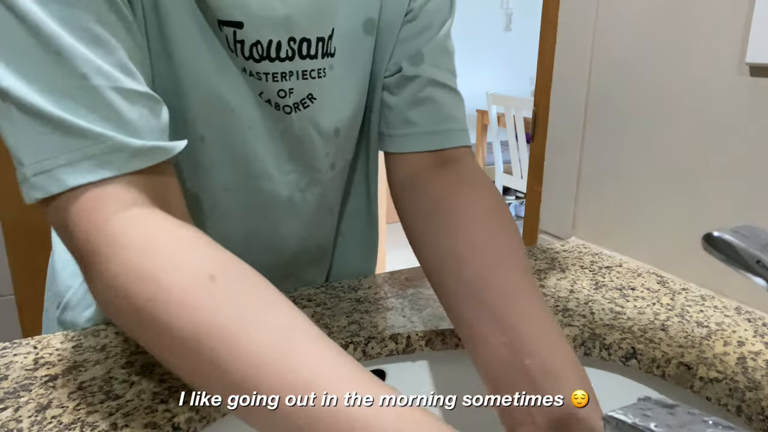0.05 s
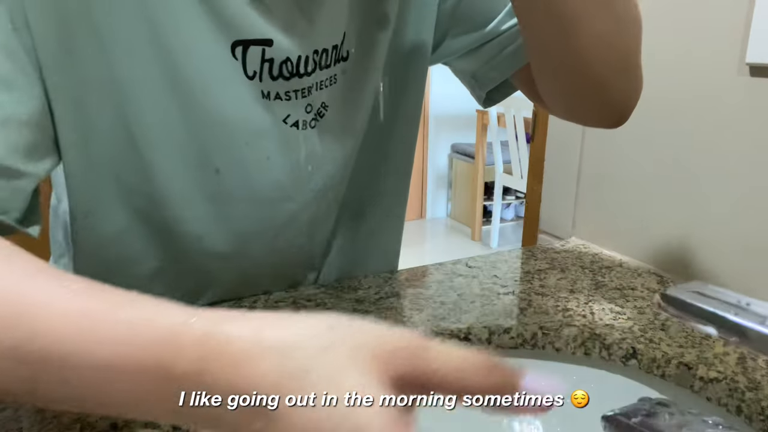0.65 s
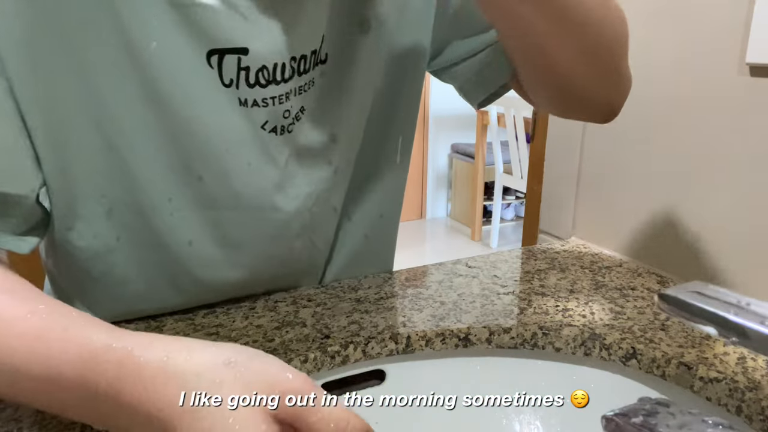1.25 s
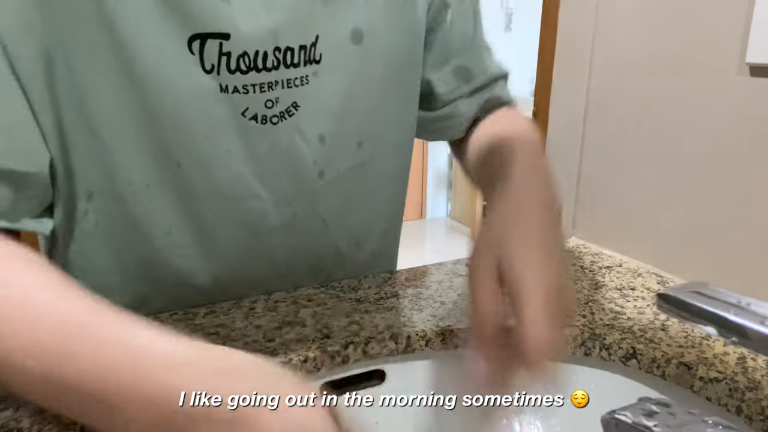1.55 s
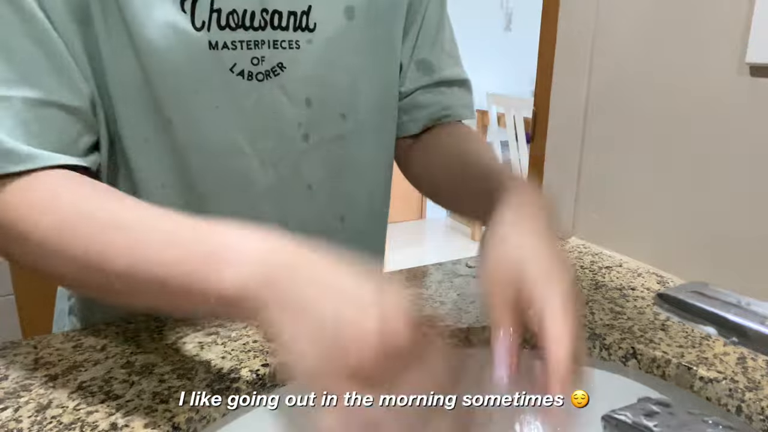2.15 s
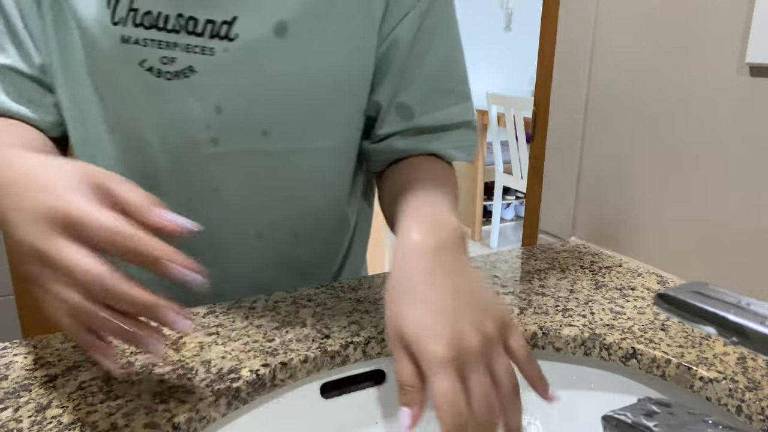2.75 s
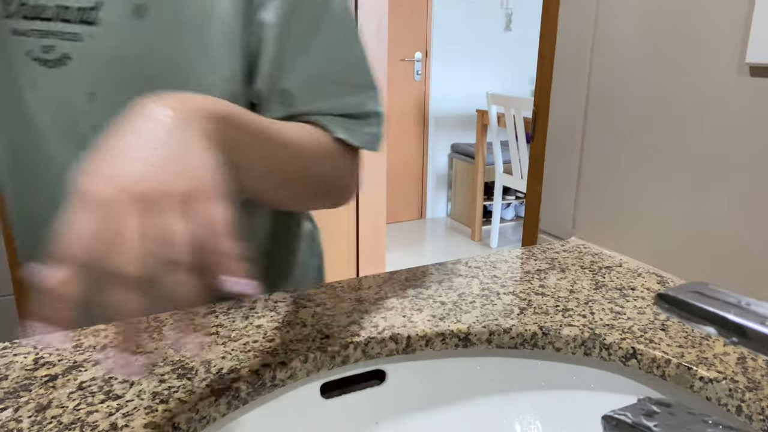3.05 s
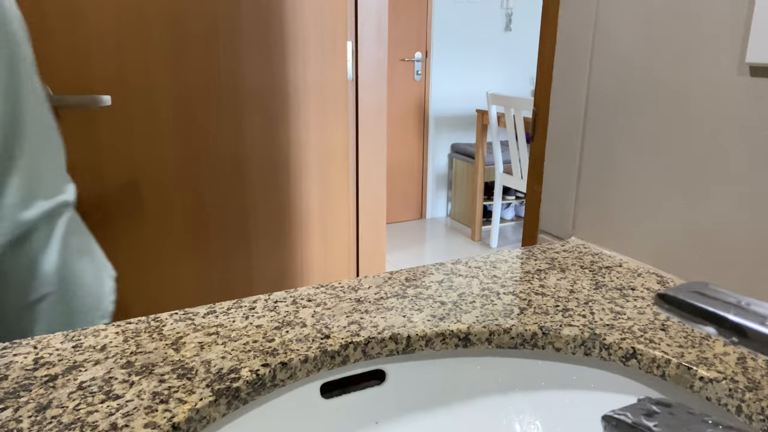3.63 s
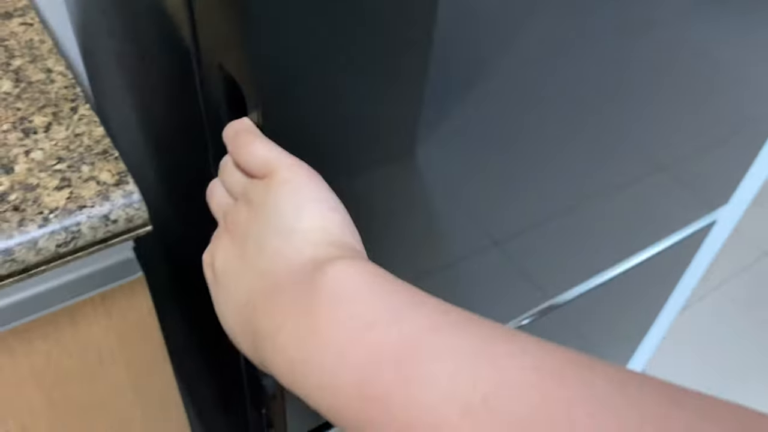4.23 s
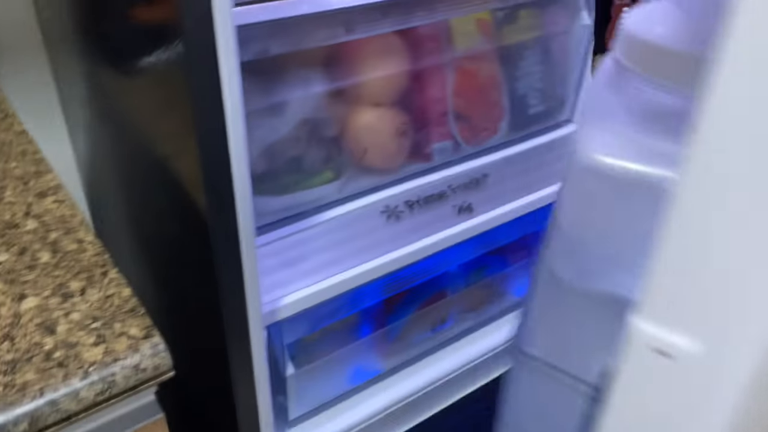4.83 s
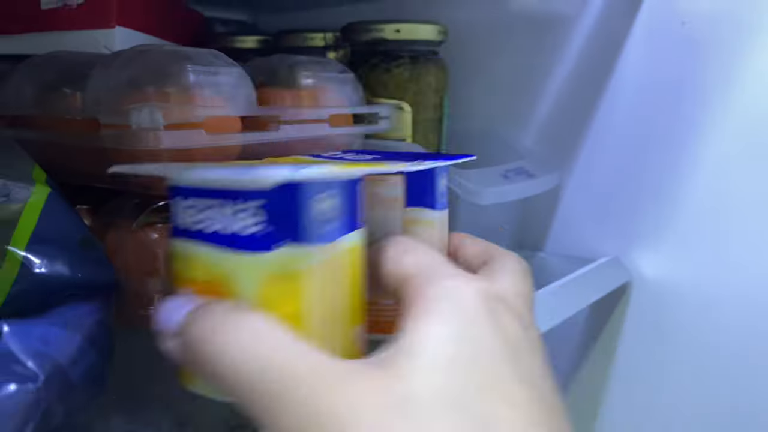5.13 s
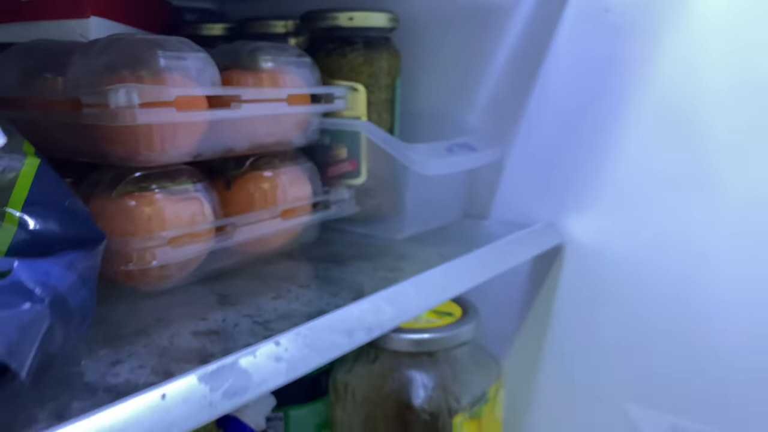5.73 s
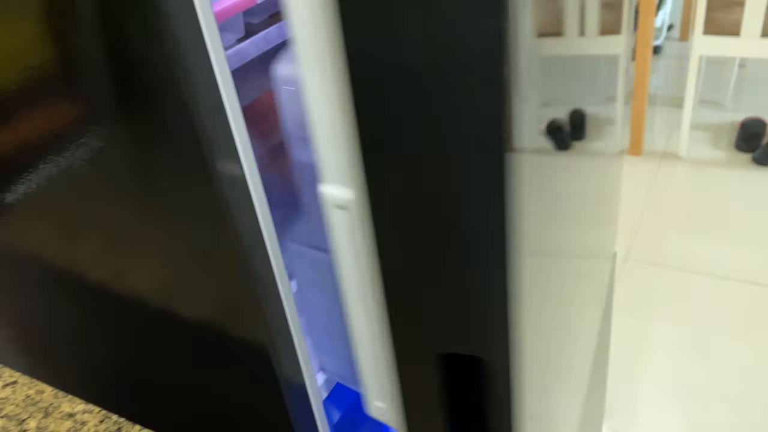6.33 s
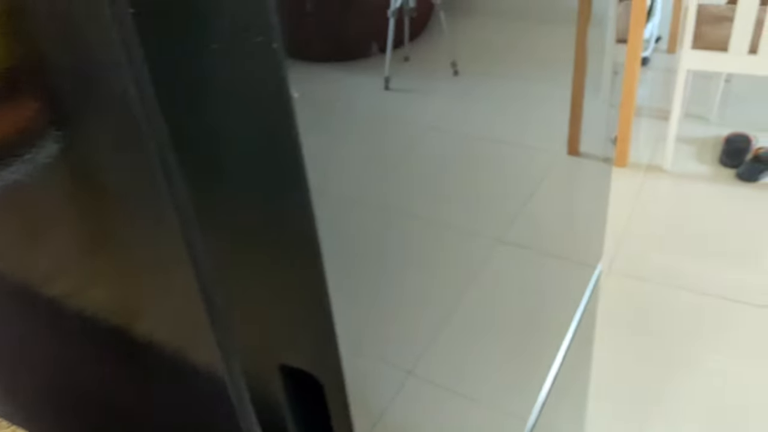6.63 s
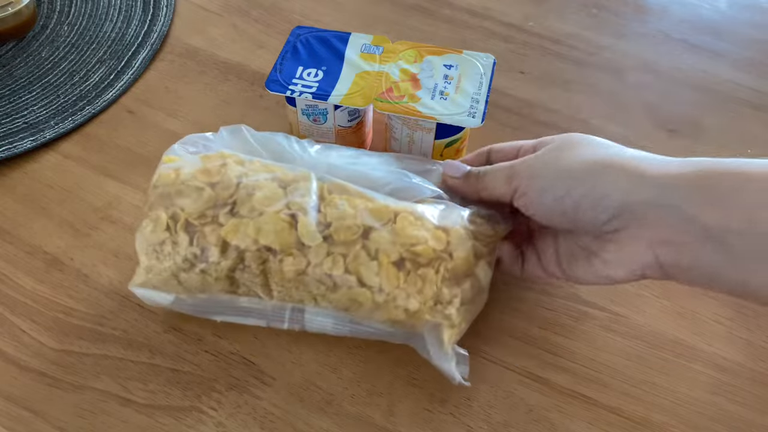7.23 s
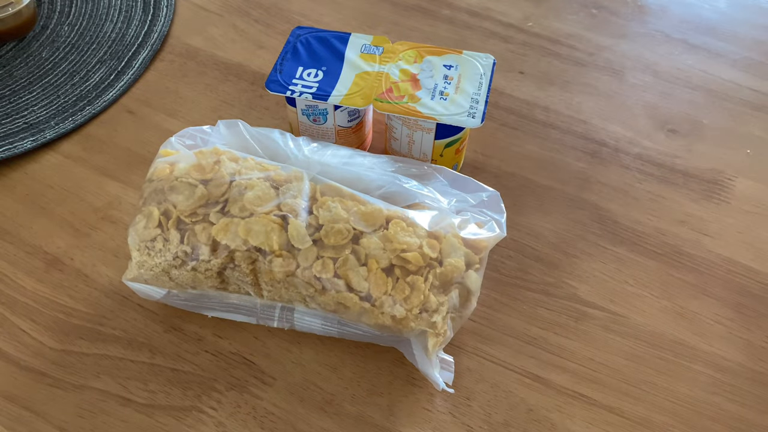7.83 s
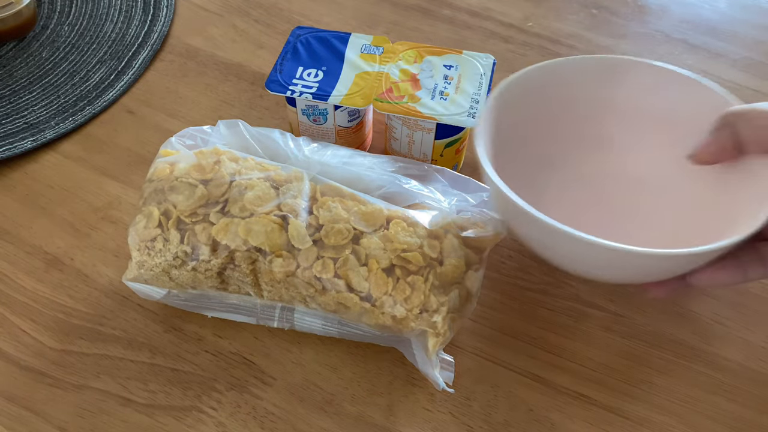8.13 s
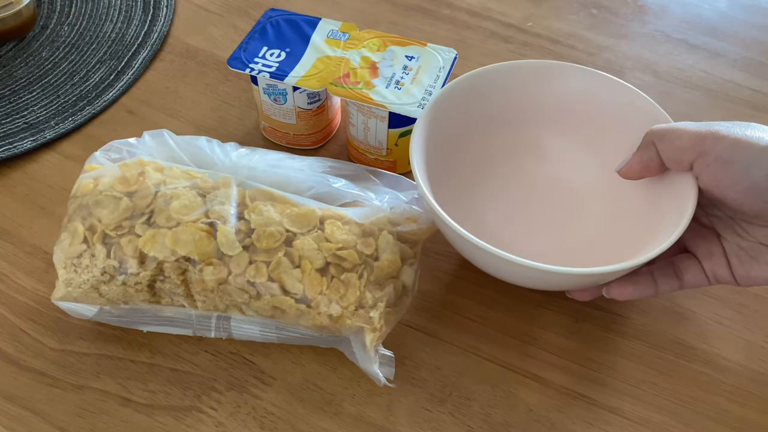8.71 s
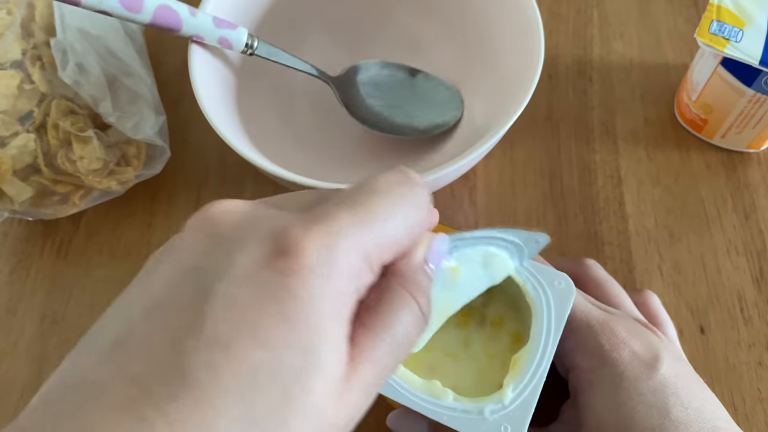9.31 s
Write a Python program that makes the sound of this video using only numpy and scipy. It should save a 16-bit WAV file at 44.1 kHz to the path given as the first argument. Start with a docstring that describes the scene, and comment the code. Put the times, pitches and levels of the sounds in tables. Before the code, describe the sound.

Running water and drips under a fan hum, then a slammed fridge door, a crackling cereal bag and a tearing foil lid.

```python
"""Water hisses from a tap and is shut off; hands drip while an extractor fan drones in its duct.
Three more scenes of a morning at home follow. A fridge gasket peels open, jars knock, and the slammed
door sets the cabinet booming. A cereal bag crackles and lands on a table with a bowl, while two heavy
thuds ring a wooden panel in another room. Last, a foil lid rips off a yoghurt cup by stick-slip of its
glue. Each impact is a brief force that excites resonances, followed by the echo of hard walls."""
import sys
import numpy as np
from scipy import signal
from scipy.fft import rfft, irfft, next_fast_len
from scipy.io import wavfile

SR = 44100
rng = np.random.default_rng(int(sys.argv[2]) if len(sys.argv) > 2 else 0)


def master_out(mix):
    """Clip the mix to full scale and print it as 16-bit PCM to the path in sys.argv[1]."""
    frames = np.transpose(np.atleast_2d(mix))
    ceiling = np.clip(frames, -1, 1)
    pcm = np.round(ceiling * 32767).astype(np.int16)
    wavfile.write(sys.argv[1], SR, pcm)


N = 422037
TIME = np.arange(N) / SR
BATHROOM_END_S, FRIDGE_END_S, TABLE_END_S = 4.22, 6.82, 8.955


def water_jet(shut_s=0.35, shut_db_per_s=88):
    """Bubble resonance: air carried in the jet fizzes and rings, fading as the tap is shut."""
    # spectrum of the fizz: frequency_hz, density_db
    spectrum = [(200, -21), (500, -2.5), (900, 4.5), (1500, 1.5), (3000, -0.5), (8000, -0.5), (13000, -2.5),
                (16000, -11.5)]
    # last water running off the hands: peak_s, level_db, rise_s, release_s
    run_off = [(.94, -61, 2.4, .7)]
    valve = from_db(-shut_db_per_s * np.maximum(TIME - shut_s, 0))
    flow = dying(0, db=-39.5, db_per_s=8.5) * valve + swells(run_off)
    fizz = colour(diffuse() + from_db(-2.5) * near(grains(2500, 5.7), 0.14, scatter_db=1), spectrum)
    bubbles = sum(resonate(grains(25, 3.0), hz, hz / 14) for hz in np.geomspace(550, 3200, num=7))
    return flow * (fizz + from_db(-17.5) * bubbles)


def splashes():
    """Damped resonance: air pockets gulp, the larger ones for longer, and drops tick on the basin."""
    # air pockets in the water and the closing spout: start_s, level_db, pitch_hz
    pockets = [(.075, -35, 1970), (.11, -31.5, 850), (.15, -30, 580), (.395, -31, 533), (.413, -30, 3200),
               (.428, -29.5, 670), (.446, -21, 470), (.452, -35.5, 1400), (.491, -31.5, 5300),
               (.54, -32.5, 510)]
    # drops hitting the basin: start_s, level_db, pitch_hz
    drop_hits = [(0.056, -22.5, 12400), (0.158, -28, 11500), (0.309, -20, 6600), (0.5343, -29, 9200),
                 (.626, -44, 7600), (.7997, -41, 7750), (.9712, -40, 5140), (1.305, -45, 13300),
                 (1.3875, -46, 5300), (1.5963, -42.5, 7500), (2.201, -45, 5110)]
    # wet hands rubbing and flicking water: start_s, level_db, pitch_hz, t60_s
    flicks = [(.79, -53, 6000, .2), (.95, -57, 7000, 0.29), (1.02, -64, 4950, .1), (2.17, -61.5, 9000, 0.3),
              (2.68, -54, 4960, 0.28)]
    glugs = knocks(sized(pockets, t60_at_1khz=.09, exponent=.45), damping=0.32)
    drops = knocks([(s, db, hz, 0.02) for s, db, hz in drop_hits], damping=1.5)
    water = glugs + from_db(-1.5) * drops + knocks(flicks, damping=1.8)
    return near(water, 0.17, scatter_db=-1.5) + from_db(-3) * room(water)


def door_slam():
    """Impact excitation: the fridge door clacks, rings the cabinet's modes and fills the room."""
    # door meeting the cabinet: start_s, thump_db, clack_db
    slams = [(6.52, -9, -10)]
    # modes of the panels and the long boom of the kitchen: pitch_hz, level_db, t60_s
    cabinet_modes = [(63, -1.5, 0.29), (64.8, -18.5, 6.2), (154.7, -16, 0.27), (251.6, -21, 0.29),
                     (304.6, -13, 0.27), (341, -26, 0.67), (538, -40, 0.2), (690, -23, 0.38)]
    # spectrum of the clack: frequency_hz, density_db
    spectrum = [(60, 6.5), (110, 4), (350, 0), (500, -4.5), (1000, -7.5), (1800, -14.5), (3000, -16),
                (7000, -23.5), (11000, -26.5), (13600, -23), (16000, -51)]
    clack = colour(bursts([(s, db, .06) for s, _, db in slams]), spectrum)[0]
    thump = struck([(s, db) for s, db, _ in slams], cabinet_modes)
    echo = room(colour(impulses([(s, db) for s, _, db in slams]), spectrum))
    crash = from_db(3) * near(clack, -0.19, scatter_db=-7) + from_db(22) * echo
    return thump + crash * from_db([[1], [-1]])


def fridge_handling():
    """Friction and impact: the gasket peels and pops, cups scrape, bottles knock, the latch clicks."""
    # gasket peeling off, then brushing and squeezing shut: peak_s, level_db, rise_s, release_s
    gasket_moves = [(4.305, -26.5, .22, 0.12), (4.41, -41.5, 0.46, 0.47), (6.48, -47.5, 0.9, 0.14),
                    (6.526, -17, 0.06, 0.036)]
    # spectrum of the gasket: frequency_hz, density_db
    gasket_spectrum = [(29, -28), (50, -0.5), (118, -15), (165, -3), (230, -12), (449, -8.5), (494, -18.5),
                       (836, -18), (1630, -26), (2070, -28), (15000, -57.5)]
    # cups dragged along the shelf: peak_s, level_db, rise_s, release_s
    shelf_drags = [(5.1, -70.5, 0.44, .12), (5.17, -63, .04, 0.42), (5.27, -67.5, 0.28, 0.14),
                   (5.434, -65.5, 0.057, 0.16), (5.9, -66.5, 0.92, 0.49)]
    # gasket popping open, bottles and racks knocking, door latch clicking:
    # start_s, level_db, pitch_hz, tick_db
    impacts = [(4.302, -30.5, 740, -53), (4.402, -40.5, 850, -64), (4.643, -48.5, 250, -82),
               (4.777, -59.5, 1810, -68), (4.82, -62.5, 710, -65), (5.078, -50.5, 202, -72),
               (5.154, -52, 244, -45), (5.163, -46.5, 1130, -53), (5.93, -47, 224, -54),
               (6.164, -52, 1580, -66), (6.271, -52, 706, -78), (6.308, -44.5, 1000, -62),
               (6.423, -34, 396, -83), (6.608, -29.5, 704, -24)]
    gasket = swells(gasket_moves) * colour(grains(1500, 3.5), gasket_spectrum)[0]
    drag = swells(shelf_drags) * resonate(diffuse(), 2500, width_hz=4200)
    ticks = bursts([(s, tick_db, .04) for s, _, _, tick_db in impacts])
    rings = knocks(sized(impacts, t60_at_1khz=0.096, exponent=0.71), damping=1.0)
    contacts = gasket + ticks + rings
    return near(contacts, 0.12, scatter_db=4.5) + from_db(-9) * room(contacts) + drag


def bag_creases():
    """Buckling: each crease of the plastic bag snaps through with a tick and a short ring."""
    # creases snapping: start_s, level_db, pitch_hz, tick_db
    snaps = [(6.854, -30, 1280, -29.5), (6.934, -30.5, 1700, -46), (6.997, -28.5, 630, -26.5),
             (7.012, -22.5, 1890, -36), (7.05, -24.5, 630, -22.5), (7.095, -34, 1820, -21.5),
             (7.215, -37, 1130, -39), (7.309, -42, 1040, -17.5), (7.343, -38, 600, -32),
             (7.396, -31, 2400, -32), (7.441, -34, 560, -44), (7.533, -36.5, 820, -36.5),
             (7.586, -39, 2850, -45), (7.726, -43.5, 1220, -34), (7.885, -52, 4200, -42),
             (7.903, -41, 2310, -54)]
    rings = knocks([(s, db, hz, 0.016) for s, db, hz, _ in snaps], damping=1.57)
    return rings + bursts([(s, tick_db, 0.013) for s, _, _, tick_db in snaps])


def bag_and_bowl(slide_end_s=8.56):
    """Impact and granular noise: bag and bowl strike the table, flakes shift, the bowl slides."""
    # spectrum of the flakes and the contacts with the table: frequency_hz, density_db
    spectrum = [(60, -25), (120, -3), (300, -1), (700, -1.5), (1400, -4), (2200, -4), (5200, -4),
                (7500, -10), (10500, -10.5), (13700, -13), (16000, -33)]
    # bag, then bowl, landing: start_s, level_db, t60_s
    landings = [(7.1255, -17, 0.13), (7.130, -24.5, 0.23), (8.165, -31, 0.16), (8.204, -40, 0.44)]
    # table top answering them: start_s, level_db, pitch_hz, t60_s
    table_knocks = [(7.13, -31, 100, .2), (8.162, -32, 364, 0.033), (8.199, -25, 2230, 0.023)]
    # flakes shifting in the bag: peak_s, level_db, rise_s, release_s
    bag_shifts = [(7.25, -38.5, 0.5, 0.86), (7.77, -59, 0.2, 0.12)]
    # the bowl's foot clicking on the wood: start_s, level_db, t60_s
    bowl_clicks = [(8.1607, -23.5, 0.021), (8.1985, -17, 0.019)]
    bag_lands_s, bowl_lands_s = landings[0][0], bowl_clicks[0][0]
    snaps = bag_creases()
    relaxing_creases = dying(bag_lands_s, db=-45, db_per_s=32) * colour(grains(30, 1.9), spectrum)[0]
    impacts = colour(bursts(landings), spectrum)[0] + knocks(table_knocks, damping=0.42)
    crackle = near(grains(660, 8.5), 0.12, scatter_db=-3)
    shifting = swells(bag_shifts)
    slide = dying(bowl_lands_s, db=-52.5, db_per_s=14) * gate(0, slide_end_s)
    rustle = colour((from_db(-5) * shifting + slide) * diffuse() + shifting * crackle, spectrum)
    contacts = snaps + relaxing_creases + impacts
    direct = near(contacts, 0.19, scatter_db=4.5) * from_db([[.4], [-.4]])
    bowl = delayed_pair(bursts(bowl_clicks), lag_ms=.2)
    return direct + bowl + rustle + from_db(-9.5) * room(contacts + bowl[0])


def thuds():
    """Modal ringing: dull blows on a wooden panel in another room, with strong reverberation."""
    # heavy blows: start_s, level_db, t60_s
    hits = [(8.56, -12, 0.066), (8.783, -25.5, 0.099), (8.79, -21, 0.1), (8.825, -26.5, 0.14),
            (8.846, -29.5, 0.15)]
    # spectrum of a blow: frequency_hz, density_db
    spectrum = [(50, -28), (88, 4), (122, -14), (155, -1.5), (240, -3), (320, 0.5), (420, -2.5), (540, -2),
                (950, -9), (1400, -13), (2500, -33.5), (6000, -50), (12000, -75)]
    # modes of the panel: pitch_hz, level_db, t60_s
    panel_modes = [(295, -8, 0.21), (338, 0, 0.39), (528, -7, .32), (693, -2.5, 0.31), (726, -2, 0.45),
                   (907, -8, 0.49)]
    blows = colour(bursts(hits), spectrum)[0]
    panel = from_db(-13.5) * struck([(s, db) for s, db, _ in hits], panel_modes)
    cracks = bursts([(s, db - 34, .035) for s, db, _ in hits])   # the hard first contact
    return from_db(3) * delayed_pair(blows + panel + cracks, lag_ms=0.28) + from_db(2) * room(blows)


def foil_lid(catches=5, catch_s=.0104, full_pull_db=-22, cup_hz=1930, opens_s=9.235):
    """Stick-slip: the glue catches and lets go, crackling the foil and ringing the cup until it opens."""
    # pulls on the lid: start_s, length_s, level_db
    pulls = [(8.996, .026, -33.5), (9.04, .031, -24), (9.156, .009, -32.5), (9.175, .038, -26.5),
             (9.218, .042, -22.5), (9.271, .019, -25), (9.359, .019, -29), (9.402, .036, -36.5),
             (9.444, .046, -25.5), (9.51, .018, -28.5), (9.551, .016, -25)]
    # foil crumpling between the fingers: peak_s, level_db, rise_s, release_s
    crumples = [(9.08, -44.5, 0.09, 0.37), (9.33, -35.5, 0.41, 0.57), (9.49, -39, 0.43, 0.12)]
    # spectrum of the foil: frequency_hz, density_db
    spectrum = [(200, -4.5), (600, -8), (1100, -2.5), (2000, -3), (3200, -0.5), (4700, 1), (7500, -2.5),
                (10300, 0), (13500, 0.5), (15500, -12), (16500, -9)]
    # fingers bumping the cup on the table: start_s, level_db, pitch_hz, t60_s
    bumps = [(9.078, -44, 194, 0.15), (9.235, -35.5, 143, 0.22), (9.33, -63, 201, 0.14)]
    sag_octaves, scatter_octaves, jitter = 0.08, 0.2, 0.13
    foil = swells(crumples) * grains(900, 1.7)
    cup, t = np.zeros(N), TIME[:SR // 40]
    for s, length_s, db in pulls:
        # weaker pulls slip for a smaller share of each catch
        slip_s = catch_s * min(from_db(.85 * (db - full_pull_db)), 1)
        for k in range(catches):
            slipping = t < min(slip_s, length_s - k * catch_s)
            slip = from_db(db) * grains(3200, 4.8, size=len(t)) * slipping
            # each catch slackens the lid, which lowers its pitch
            hz = cup_hz * 2 ** (scatter_octaves * rng.standard_normal() - sag_octaves * k)
            ring = resonate(resonate(slip, hz, 0.58 * hz), hz, 0.6 * hz)
            start_s = s + catch_s * (k + jitter * min(k, 1) * rng.standard_normal())
            add(foil, start_s, slip)
            add(cup, start_s, rms_one(ring) * slip.std())
    cup *= from_db(-4.5 - 125 * np.maximum(TIME - opens_s, 0))
    outside = colour(foil, spectrum)[0] + knocks(bumps, damping=0.71)
    direct = near(outside + cup, 0.12, scatter_db=-1.5)
    return direct + from_db(-11.5) * room(outside + from_db(-1) * cup)


def extractor_fan():
    """Beating and turbulence: close tones beat about ten times a second as rushing air rings the duct."""
    # motor and its wobbling rotor: pitch_hz, level_db
    tones = [(118.7, -22), (128.3, -36.5), (146.5, -48), (155.5, -43), (2815, -65)]
    # resonances of duct and housing: pitch_hz, width_hz, level_db
    duct_modes = [(38, 1.9, -45), (59.2, 2.3, -40.5), (73, 9.5, -40), (95.5, 3, -48), (248.9, 6, -40),
                  (267.1, 6.5, -35.5), (2065, 15, -64.5), (2848, 48, -59.5), (4363, 90, -65)]
    # spectrum of the rushing air: frequency_hz, density_db
    spectrum = [(25, -14.5), (60, -1.5), (150, 1), (200, -6.5), (310, -12.5), (400, -11.5), (640, -21.5),
                (830, -18), (1100, -25), (2600, -31.5), (3300, -39.5), (5700, -48.5), (7600, -48.5),
                (15000, -71)]
    hum = sum(from_db(db) * np.sqrt(2) * np.sin(2 * np.pi * (hz * TIME + rng.random()))
              for hz, db in tones)
    turbulence = diffuse()
    duct = sum(from_db(db) * rms_one(resonate_twice(turbulence, hz, 2 * width_hz))
               for hz, width_hz, db in duct_modes)
    air = from_db(-35) * colour(diffuse(), spectrum)
    return hum * from_db([[-1.2], [1.0]]) + duct + air * from_db([[.6], [-.6]])


def hand_brush():
    """Friction noise: a hand sweeping the table gives a soft band of hiss."""
    # strokes of the hand: peak_s, level_db, rise_s, release_s
    strokes = [(7.765, -60.5, .3, 0.18), (8.07, -61.5, 0.23, .35)]
    return swells(strokes) * resonate(diffuse(), 1231.6, width_hz=410)


def compressor(hum_hz=70.5, whine_hz=2590):
    """Machine vibration: a brief hum throbs against narrow-band noise, beside a faint steady whine."""
    throb = rms_one(resonate_twice(rng.standard_normal(N), hum_hz, width_hz=35))
    hum = from_db(-62) * (np.sin(2 * np.pi * hum_hz * TIME) + 0.88 * throb) * gate(5.25, 6.0)
    whine = from_db(-84.5) * resonate(rng.standard_normal(N), whine_hz, width_hz=121)
    return hum + whine


def room_ambience():
    """Diffuse background noise: the hush of the flat, at its own level in each of the later scenes."""
    # spectrum of the hush: frequency_hz, density_db
    spectrum = [(18, -28), (30, -8), (79, 1.5), (190, -16), (355, -17), (754, -26), (2560, -30),
                (8470, -42), (10700, -38.5), (11900, -44), (15000, -44)]
    gain = (from_db(-67) * gate(BATHROOM_END_S, FRIDGE_END_S)
            + from_db(-57.5) * gate(FRIDGE_END_S, TABLE_END_S)
            + from_db(-53.5) * gate(TABLE_END_S, N / SR))
    return gain * colour(diffuse(), spectrum)


def room(x, size=SR * 5 // 8):
    """Reverberation: the diffuse echo of hard walls dies faster in each higher octave; unit gain."""
    # reverberation time: frequency_hz, t60_s
    decay_times = [(60, .7), (250, 0.52), (2000, 0.48), (6000, 0.39), (14000, 0.27)]
    noise, tail = diffuse(size), 0
    for hz in 62.5 * 2 ** np.arange(9):
        edges_hz = [hz / np.sqrt(2), min(hz * np.sqrt(2), SR * .45)]
        octave = signal.butter(2, edges_hz, "band", fs=SR, output="sos")
        tail = tail + signal.sosfilt(octave, noise) * fade(at_hz(decay_times, hz), size)
    tail *= np.minimum(TIME[:size] / .008, 1)
    return signal.oaconvolve(np.atleast_2d(x)[:1], rms_one(tail) / np.sqrt(size), axes=1)[:, :N]


def near(x, lag_ms, scatter_db, size=1800):
    """Early reflections: hands and surfaces scatter a close source differently to each microphone."""
    treble = signal.butter(2, 450, "high", fs=SR, output="sos")
    scatter = signal.sosfilt(treble, rng.standard_normal((2, size)) * fade(0.019, size))
    scatter *= from_db(scatter_db) / np.linalg.norm(scatter, axis=1, keepdims=True)
    pair = delayed_pair(np.ravel(x), lag_ms)
    reflections = signal.oaconvolve(pair, scatter, axes=1)[:, :N]
    return (pair + reflections) / np.sqrt(1 + from_db(scatter_db) ** 2)


def diffuse(size=N, coherent_below_hz=380):
    """Diffuse field: noise from all around is alike at both microphones in the bass only."""
    n = next_fast_len(size, True)
    mid, side = rfft(rng.standard_normal((2, n)))
    alike = 1 / (1 + (np.arange(len(mid)) * SR / n / coherent_below_hz) ** 4)
    return irfft(np.sqrt(1 + alike) * mid + np.sqrt(1 - alike) * side * [[1], [-1]], n)[:, :size]


def delayed_pair(x, lag_ms):
    """Arrival-time difference: a positive lag reaches the right channel later."""
    lag = round(lag_ms * SR / 1000)
    return np.array([np.roll(x, max(-lag, 0)), np.roll(x, max(lag, 0))])


def knocks(rows, damping):
    """Forced resonance: each blow (start_s, level_db, pitch_hz, t60_s) stirs one broad mode."""
    out = np.zeros(N)
    for s, db, hz, t60 in rows:
        force = fade(t60) * rng.standard_normal(SR // 2)
        ring = resonate_twice(force, hz, min(damping * hz, SR / 5))
        add(out, s, from_db(db) * ring * np.linalg.norm(fade(t60)) / np.linalg.norm(ring))
    return out


def sized(rows, t60_at_1khz, exponent):
    """Size scaling: give each blow a decay time that is longer for larger, lower-pitched bodies."""
    return [(s, db, hz, t60_at_1khz * (1000 / hz) ** exponent) for s, db, hz, *_ in rows]


def struck(rows, modes):
    """Superposition: each blow (start_s, level_db) sets all modes of a body ringing."""
    ring = sum(from_db(db) * fade(t60) * np.sin(2 * np.pi * hz * TIME[:SR // 2]) for hz, db, t60 in modes)
    out = np.zeros(N)
    for s, db in rows:
        add(out, s, from_db(db) * ring)
    return out


def bursts(rows):
    """Contact noise: each blow (start_s, level_db, t60_s) is a dying cluster of tiny contacts."""
    out = np.zeros(N)
    for s, db, t60 in rows:
        add(out, s, from_db(db) * fade(t60) * rng.choice([-1, 1], SR // 2))
    return out


def impulses(rows):
    """Impulsive force: one sharp push for each (start_s, level_db)."""
    out = np.zeros(N)
    for s, db in rows:
        add(out, s, from_db([db]))
    return out


def grains(per_s, spread_db, size=N):
    """Poisson process: random clicks of uneven size; rms 1."""
    sizes = from_db(spread_db * np.minimum(rng.exponential(1, size), 4)) * rng.choice([-1, 1], size)
    return rms_one(sizes * (rng.random(size) < per_s / SR))


def colour(x, spectrum, size=8192):
    """Minimum-phase filter with the given spectrum and unit power gain."""
    magnitude = from_db(at_hz(spectrum, np.arange(size // 2 + 1) * SR / size))
    cepstrum = irfft(np.log(magnitude))
    cepstrum[1:size // 2] *= 2
    cepstrum[size // 2 + 1:] = 0
    response = irfft(np.exp(rfft(cepstrum)))[:size // 2]
    response /= np.linalg.norm(response)
    return signal.oaconvolve(np.atleast_2d(x), [response], axes=1)[:, :x.shape[-1]]


def resonate(x, hz, width_hz):
    """Damped oscillator with unit power gain for noise."""
    r = np.exp(-np.pi * width_hz / SR)
    feedback = [1, -2 * r * np.cos(2 * np.pi * hz / SR), r * r]
    return signal.lfilter(np.sqrt((1 - r * r) / 2) * np.array([1, 0, -1]), feedback, x)


def resonate_twice(x, hz, width_hz):
    """Two equal resonators in cascade, for steeper skirts."""
    return resonate(resonate(x, hz, width_hz), hz, width_hz)


def swells(rows):
    """Exponential growth and decay around each peak; rise and release times span 60 dB."""
    return sum(from_db(db - 60 * np.maximum((s - TIME) / rise_s, (TIME - s) / release_s))
               for s, db, rise_s, release_s in rows)


def dying(start_s, db, db_per_s):
    """Gain that sets in at once and decays exponentially."""
    return (TIME >= start_s) * from_db(db - db_per_s * np.maximum(TIME - start_s, 0))


def fade(t60, size=SR // 2):
    """Exponential decay by 60 dB in t60 seconds."""
    return from_db(-60 * np.arange(size) / SR / t60) + 1e-18


def gate(start_s, end_s):
    """Time window with 4 ms ramps."""
    return np.clip(np.minimum(TIME - start_s, end_s - TIME) / .004, 0, 1)


def add(track, start_s, sound):
    """Mix a sound in at a time."""
    i = int(start_s * SR)
    track[..., i:i + sound.shape[-1]] += sound[..., :max(N - i, 0)]


def at_hz(points, hz):
    """Read a table on a log-frequency axis."""
    table_hz, value = np.transpose(points)
    return np.interp(np.log(np.maximum(hz, 1)), np.log(table_hz), value)


def from_db(db):
    return 10 ** (np.asarray(db) / 20)


def rms_one(x):
    return x / np.sqrt(np.mean(x ** 2) + 1e-20)


def scene():
    """Superposition of the sources: bathroom, fridge, table and lid in turn."""
    bathroom = gate(-1, BATHROOM_END_S) * (extractor_fan() + water_jet() + splashes())
    fridge = gate(BATHROOM_END_S, FRIDGE_END_S) * (fridge_handling() + compressor() + door_slam())
    table = gate(FRIDGE_END_S, TABLE_END_S) * (bag_and_bowl() + hand_brush() + thuds())
    return bathroom + fridge + table + foil_lid() + room_ambience()


def record(dry, overload=0.85, crossover_hz=8000, cutoff_hz=15850):
    """Saturation and band limiting: peaks are rounded, and one microphone feeds both channels' treble."""
    rounded = overload * np.tanh(dry / overload)
    low, high = (signal.butter(6, crossover_hz, kind, fs=SR, output="sos") for kind in ("low", "high"))
    treble = signal.sosfilt(high, rounded[0])
    # the lag changes sides with the microphones' orientation after the bathroom
    treble_pair = np.where(TIME < BATHROOM_END_S, delayed_pair(treble, .168), delayed_pair(treble, -.206))
    top_cut = signal.ellip(10, .3, 80, cutoff_hz, fs=SR, output="sos")
    return signal.sosfilt(top_cut, signal.sosfilt(low, rounded) + treble_pair)


dry = scene()
out = record(dry)
master_out(out)
```